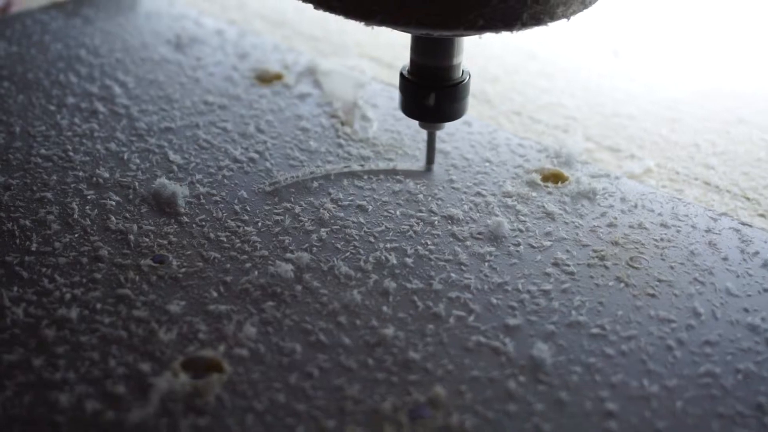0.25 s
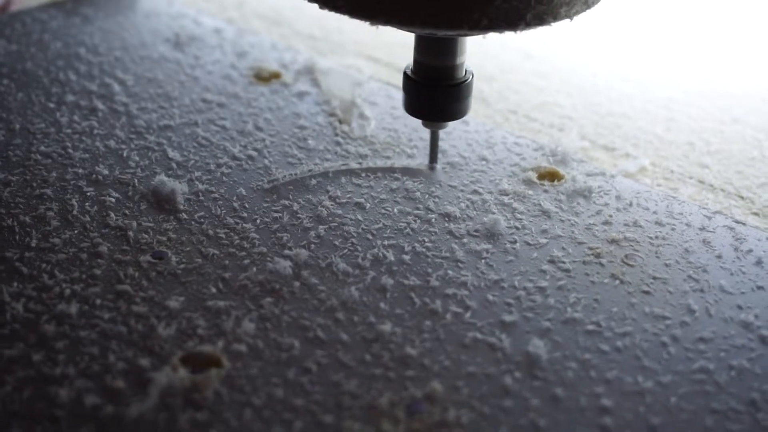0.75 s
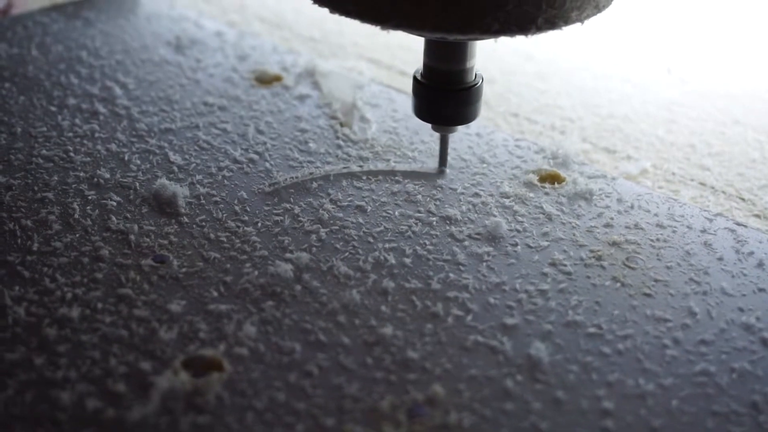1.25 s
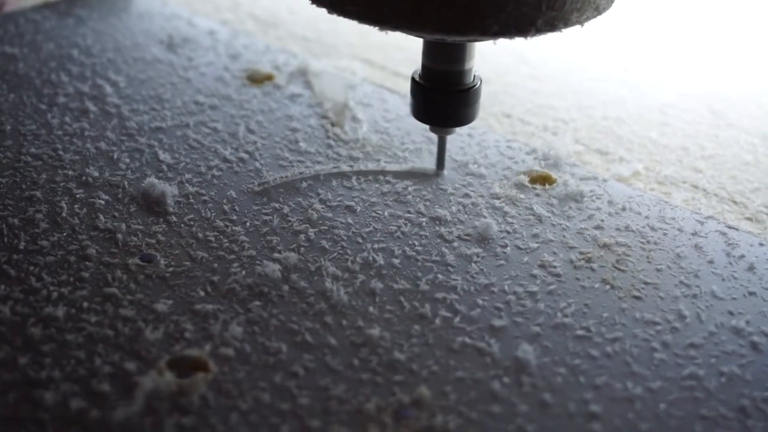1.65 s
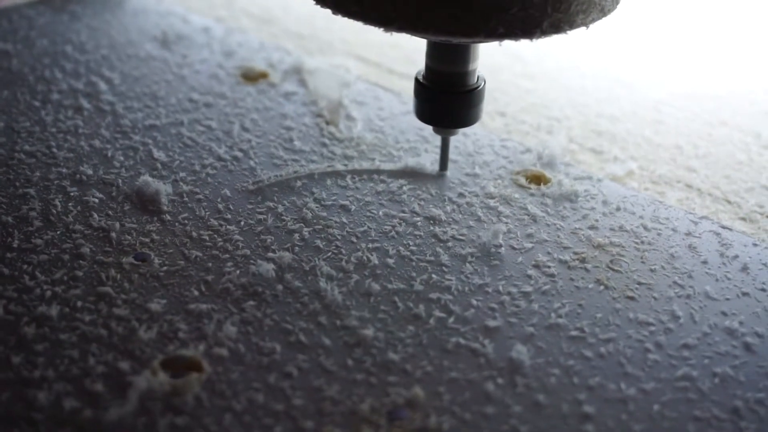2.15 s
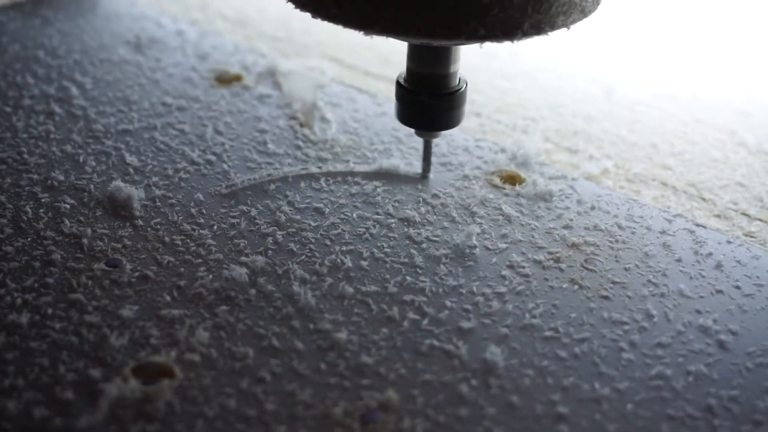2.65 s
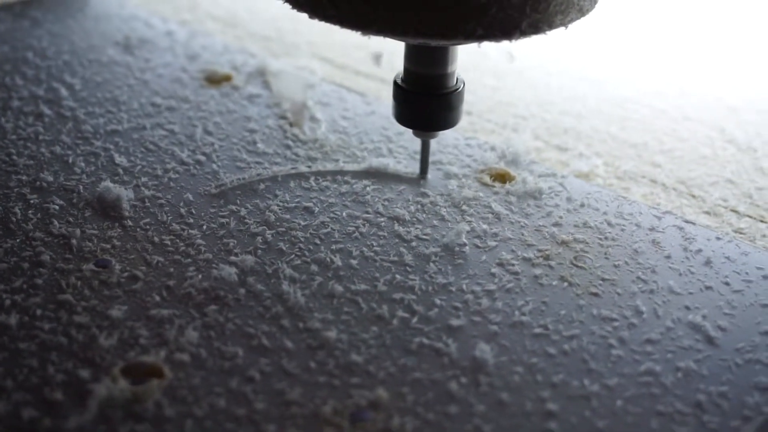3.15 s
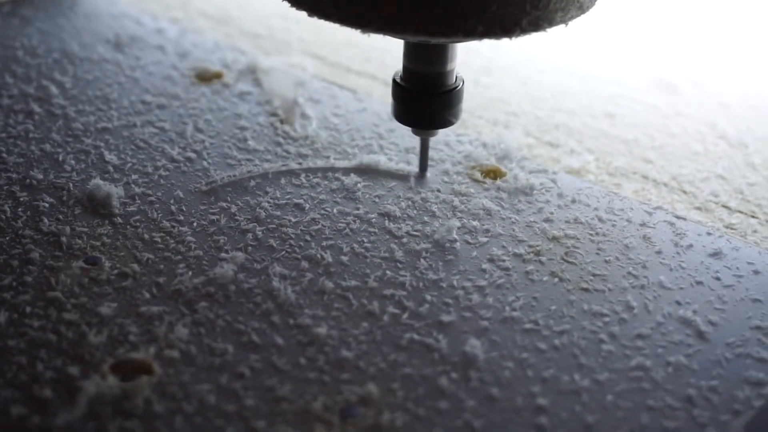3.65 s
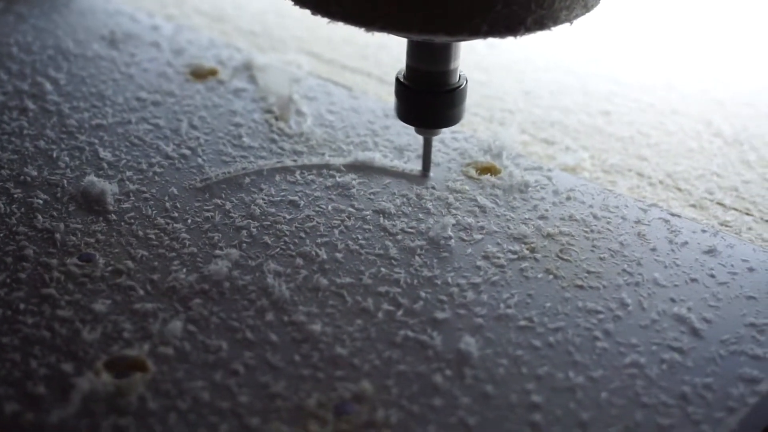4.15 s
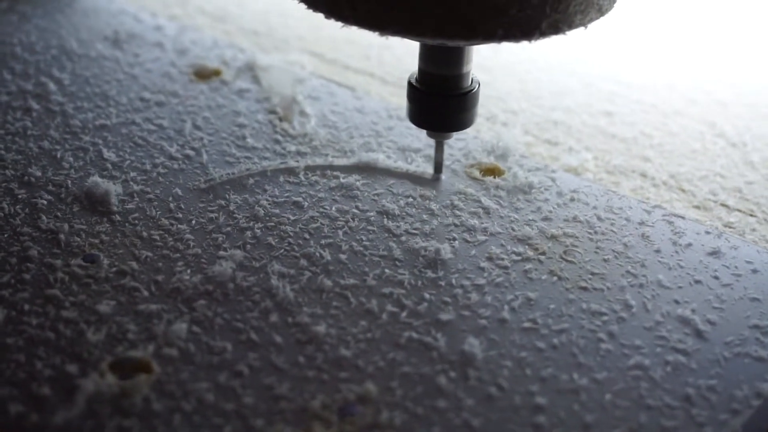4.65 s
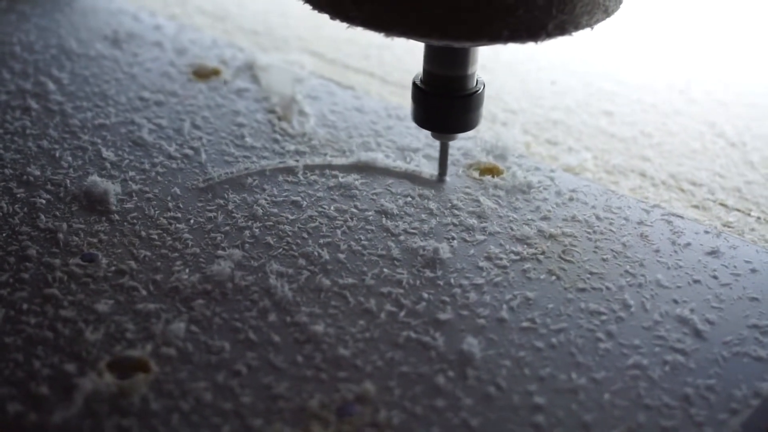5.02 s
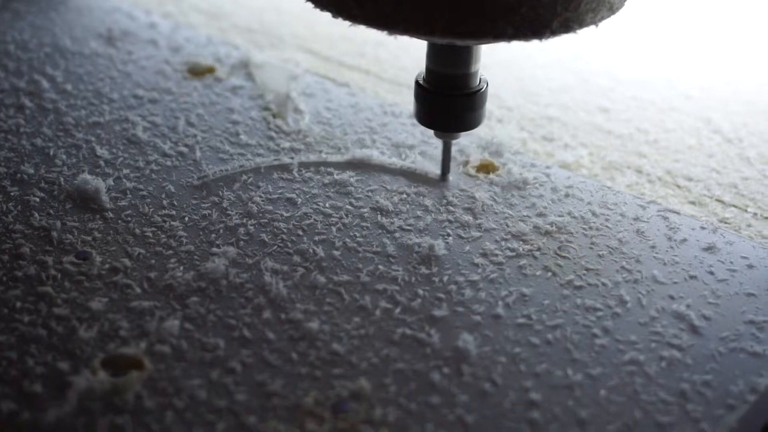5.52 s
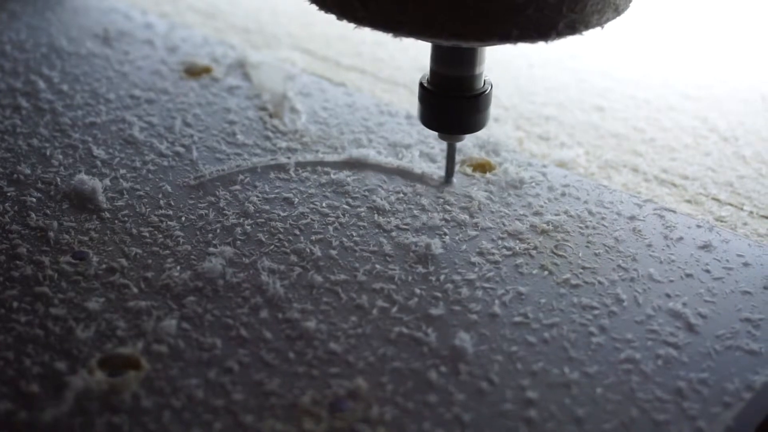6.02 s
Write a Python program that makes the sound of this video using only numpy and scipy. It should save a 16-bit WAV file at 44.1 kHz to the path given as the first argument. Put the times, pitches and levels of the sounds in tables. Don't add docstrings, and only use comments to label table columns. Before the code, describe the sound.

A small milling cutter screams through plastic sheet with a piercing, buzzy high whine, steady chip hiss and a low spindle hum underneath.

```python
import sys
import numpy as np
from scipy import signal
from scipy.fft import rfft, irfft, next_fast_len
from scipy.io import wavfile
from scipy.ndimage import map_coordinates

SR = 44100
rng = np.random.default_rng(int(sys.argv[2]) if len(sys.argv) > 2 else 0)


def digitize_waveform(pressure):
    field = np.atleast_2d(pressure).T
    bounded = np.clip(field, -1, 1)
    quanta = np.round(bounded * 32767).astype(np.int16)
    wavfile.write(sys.argv[1], SR, quanta)


def volts(x):
    e = np.asarray(x, float) / 20
    return 10 ** e


N = 276948
T = np.arange(N) / SR
PORTS = np.array([[.5], [-.5]])
SHAFT_HZ = 399.53


def unit(x):
    return x / np.sqrt(np.mean(x ** 2) + 1e-20)


def along(points, hz):
    f, v = np.transpose(points)
    return np.interp(np.log(hz + 1), np.log(f + 1), v)


def curves(rows):
    s, *columns = np.transpose(rows)
    return [np.interp(T, s, column) for column in columns]


def wobble(rate):
    coarse = T[::16]
    knots = rng.standard_normal(int(N * rate / SR) + 4)
    return np.interp(T, coarse, map_coordinates(knots, [coarse * rate]))


def rush(modes, gate=1):
    # frequency in Hz, left-right coherence from 0 to 1.
    alike = [(60, 1), (130, 1), (400, 1), (700, 1), (1400, 0.5), (3100, 0.75), (6800, 0.065),
             (15000, 0.083)]
    # frequency in Hz, left-right level difference in dB.
    sides = [(60, 0), (110, 1), (200, -4), (380, 9), (700, -6.5), (1290, -2.5), (2380, -8), (4400, -7.5),
             (8120, -1.5), (15000, -11.5)]
    m = next_fast_len(N)
    hz = np.fft.rfftfreq(m, 1 / SR)
    power = sum(volts(2 * db) / (1 + (2 * (hz - center_hz) / width_hz) ** 2) ** 2
                for center_hz, width_hz, db in modes)
    angle = np.arccos(np.clip(along(alike, hz), -1, 1)) / 2
    noise = rfft(gate * rng.standard_normal((2, N)), m)
    mid, side = noise * [np.cos(angle), np.sin(angle)]
    spectrum = np.array([mid + side, mid - side]) * np.sqrt(power) * volts(PORTS * along(sides, hz))
    return unit(irfft(spectrum, m)[:, :N])


def jams(half_s):
    # time in seconds, phase jump in cycles, level dip in dB.
    slips = [(0.294, 0.11, -4.0), (0.893, 0.14, -3.9), (1.106, 0.21, -12.1), (1.409, 0.09, -3.6),
             (1.532, 0.01, -4.8), (1.581, -0.07, -4.6), (1.979, 0.17, -9.6), (2.656, -0.61, -12.3),
             (2.728, 0.01, -6.6), (2.826, 0.11, -6.0), (2.84, 0.22, -9.0), (2.854, 0.07, -9.0),
             (3.201, -0.69, -15), (3.855, -0.14, -5.7), (3.922, 0.13, -3.4), (4.645, -0.25, -6.4),
             (4.657, 0.08, -13.4), (4.994, 0.01, -4.0), (5.188, 0.07, -3.2), (5.304, 0.25, -5.1),
             (5.314, -0.1, -4.4), (5.666, -0.04, -3.4), (5.714, -0.02, -5.8), (5.905, 0.13, -3.8),
             (5.938, 0.03, -6.5), (6.064, -0.13, -6.7), (6.082, 0.08, -7.1)]
    s, jump, dip_db = np.transpose(slips)
    kicks = np.zeros((2, N))
    kicks[:, np.round(s * SR).astype(int)] = jump, dip_db
    hump = np.hanning(round(2 * half_s * SR))
    step, dip = signal.fftconvolve(kicks, hump[None], "same", axes=1)
    return np.cumsum(step) / hump.sum(), dip


def stumbles(rate, cycles, rise_s, settle_s):
    when, size = rng.random((round(rate * T[-1]), 2)).T
    kicks = np.bincount((when * N).astype(int), -cycles * np.log(size), N)
    t = T[:SR // 4]
    response = np.exp(-t / settle_s) * (1 - np.exp(-(t / rise_s) ** 2))
    return signal.fftconvolve(kicks, response)[:N]


def rival_mode(ragged_db):
    above_hz = 271
    noise = [1, 1j] @ rng.standard_normal((2, N))
    shake = signal.lfilter([1], [1, -.985], noise) * np.exp(2j * np.pi * above_hz * T)
    flare = volts(-26 - 1.8 * np.maximum(ragged_db, -8) + 3 * wobble(45))
    return (1 + flare * shake / np.abs(shake).std()) / np.sqrt(1 + 5 * flare ** 2)


def chatter(turn, bite_db, shallow):
    # left level in dB, right level in dB,
    # left drift in dB, right drift in dB, left phase lead in radians.
    ring = [(-64, -63.5, -2, -2.5, -0.1), (-54, -51, -4, 2.5, -0.6), (-45, -46, 1, 0.5, -0.2),
            (-35, -42, 5.5, 2.5, 1.0), (-30.5, -36.5, -2, 4, -0.3), (-20.2, -19.1, 1.4, -0.7, -1.5),
            (-36, -25.6, -3, 2, -3.0), (-20.6, -19.1, 1.3, 0.3, -1.8), (-34, -20.8, -2.5, 0.5, -2.5),
            (-42, -38, -3, 0, 1.7), (-40, -33, 4, 3, -1.5), (-59, -51, 3, -3, 0.6), (-59, -56, 0, 4, -1.6)]
    # left level in dB, right level in dB,
    # left drift in dB, right drift in dB, left phase lead in radians.
    octave = [(-56, -48, 2, -5, 0.1), (-56, -55, 4.5, 1, -1.8), (-53, -49, -0.5, -9, 2.6),
              (-46, -41, 3, 6, -0.3), (-51, -39.5, 4, 8, 1.3), (-45, -36, -3.5, -2, 0.3),
              (-41, -35, 6, -8.5, 0.7), (-37, -31, 1.5, -7.5, -0.5), (-46.5, -37.5, -3, -4, 3.1),
              (-54, -46, 12, -8, -3.0)]
    ring_hz, sag_hz_per_s, shallow_hz = 7149.6, .75, 9
    entry_db = 1.3
    swing_db = -3.5

    step, dip_db = jams(half_s=.006)
    ragged_db = np.roll(jams(half_s=.012)[1], round(.005 * SR))
    wander = np.cumsum(rng.standard_normal(N)) * 0.0011 + 0.013 * wobble(90)
    wander += stumbles(rate=50, cycles=0.041, rise_s=0.00072, settle_s=0.032)
    wander += -.009 * np.maximum(ragged_db, -11) * wobble(400)
    cycles = np.cumsum(ring_hz - sag_hz_per_s * T + shallow_hz * shallow) / SR + step + wander
    rival = rival_mode(ragged_db)

    spot = 2 * T / T[-1] - 1
    out = np.zeros((2, N))
    for multiple, rows in enumerate((ring, octave), 1):
        for k, (*levels, lead) in enumerate(rows, -6):
            db, drift = np.reshape(levels, (2, 2, 1))
            if multiple == 1:
                swell_db = max(0.5 - 1.16 * (k + .5) ** 2, -3.5)
                phase = (2.85 - .3 * k) * k + 3.15 - .6 * spot * (k == 0)
                phase = phase + 1.6 * np.sign(k) * (abs(k - 1) > 2)
            else:
                swell_db = -3.5
                phase = 3.4 * k - 1.2
            line_db = db + drift * spot + (swell_db + PORTS * swing_db) * spot ** 2
            line_db = line_db - (k >= 0) * entry_db * shallow + 1.1 * wobble(4.0) + 0.45 * wobble(40)
            angle = 2 * np.pi * multiple * cycles + k * turn + phase + lead * (PORTS + .5)
            out += volts(line_db) * np.real(rival * np.exp(1j * angle))
    return np.sqrt(2) * volts(bite_db + .5 * dip_db + .3 * wobble(70)) * out


def tone(phase, db, pan_db=0):
    return np.sqrt(2) * volts(db + PORTS * pan_db) * np.cos(phase)


def spindle(turn, hum_db):
    # level in dB relative to the hum, left-right difference in dB.
    shaft = [(-13, 4.5), (-30, -11), (-32.5, -12.5), (-40, -20.5), (-33, -18), (-20, 4), (-52, -10)]
    # harmonic order, level in dB, left-right difference in dB.
    field = [(2, -51, -2), (4, -69, -3), (8, -61, -2), (10, -64, 0), (11, -52, 0), (13, -48.5, 1),
             (17, -46, -6)]
    # frequency in Hz, level in dB.
    bearing = [(443, -59), (462, -57), (505, -67), (548, -74), (1444, -66), (3950, -66)]
    field_hz, meet_s = 399.93, .97
    out = tone(turn, hum_db + 0.058 * wobble(28))
    steadier_db = .5 * (hum_db + hum_db.mean())
    for k, (db, pan_db) in enumerate(shaft, 2):
        out -= tone(k * turn, steadier_db + db + 0.88 * wobble(1.88), pan_db)
    field_turn = 2 * np.pi * (field_hz * (T - meet_s) + SHAFT_HZ * meet_s)
    for k, db, pan_db in field:
        out -= tone(k * field_turn, db + .7 * wobble(3), pan_db)
    for hz, db in bearing:
        out = out + tone(2 * np.pi * hz * T, db + 0.22 * wobble(3.5))
    return out


def cutting(turn):
    # frequency in Hz, width in Hz, level in dB.
    sheet_modes = [(1209, 126, -6), (1555, 310, -16), (1917, 150, -13.5), (2453, 280, -4), (2714, 307, 3),
                   (3390, 380, -6), (4070, 83, -7.5), (4810, 77, 1)]
    # frequency in Hz, width in Hz, level in dB.
    chip_modes = [(5560, 220, -13), (5600, 730, -5.5), (6554, 520, 6.5), (7690, 520, 3), (8430, 570, -0.5),
                  (8540, 1890, -1), (11170, 950, -8.5), (12053, 310, 5.5), (12700, 590, -2.5),
                  (13600, 1100, -2.5), (14600, 1100, -1.5), (15800, 530, -1.5)]
    rise_db = 0.2656 * T
    bite = 1 + .25 * np.cos(turn)
    puff = volts(-.15 * jams(half_s=.01)[1])
    sheet = volts(-42.5 + rise_db + 0.99 * wobble(25)) * rush(sheet_modes)
    chips = volts(-28 + rise_db + 0.5 * wobble(22)) * puff * rush(chip_modes, bite)
    return sheet + chips


def machine():
    # time in seconds, feed motor effort in dB.
    feed = [
        (0, -11),
        (1, -10),
        (2.3, -7),
        (2.95, -5),
        (3.25, 6),
        (4.1, 2),
        (4.5, -4),
        (5.6, -2.5),
        (6.28, -3),
    ]
    # time in seconds, jolt in dB.
    jolts = [
        (.58, 3),
        (1.15, 5),
        (1.9, 3.5),
        (2.85, 12),
        (3.45, 4),
        (3.88, 6),
        (5.15, 4.5),
        (5.44, 6.5),
        (5.73, 4),
        (6.06, 3.5),
    ]
    # frequency in Hz, phase wander in radians, level in dB, share of effort, share of jerk.
    drone_rows = [(139, 0.91, -64, 0.67, .3), (190, 0.58, -59, 1.33, .2), (237.5, 0.65, -59, 0.34, 0.87)]
    # frequency in Hz, width in Hz, level in dB.
    frame_modes = [(60, 45, -21), (246, 185, -1.5), (397, 120, 7), (437, 12, 1.5), (837.4, 23, 6)]
    half_s = 0.11
    effort_db, = curves(feed)
    jerk_db = sum(db * np.exp(-((T - s) / half_s) ** 2) for s, db in jolts)
    frame_db = -62 + 0.23 * effort_db + jerk_db
    drones = 0
    for hz, rad, db, pull, jerk in drone_rows:
        level = volts(db + pull * effort_db + jerk * jerk_db + 2.6 * wobble(5.3))
        drones = drones + level * np.cos(2 * np.pi * hz * T + rad * wobble(5.1))
    panel = volts(frame_db + 4.5) * rush([(663, 176, 0)])
    rumble = volts(0.38 * frame_db - 31.5 + .5 * T + 1.5 * wobble(4)) * rush(frame_modes)
    return volts(.5 * T - 1.5) * (drones + panel) + rumble


def scene():
    # time in seconds, depth of cut in dB.
    bite = [
        (0, -1),
        (.62, -0.5),
        (.78, 1),
        (1.9, 0.3),
        (2.5, 1.56),
        (3.7, 0.5),
        (5.2, 0),
        (5.8, -1.5),
        (6.28, -2),
    ]
    bite_db, = curves(bite)
    shallow = .5 - .5 * np.tanh((T - .72) / 0.027)
    hum_db = -34.5 + 1.12 * T + 0.75 * bite_db - 0.85 * shallow
    turn = 2 * np.pi * SHAFT_HZ * T + 0.01 * wobble(16)
    return chatter(turn, bite_db, shallow) + spindle(turn, hum_db) + cutting(turn) + machine()


def low_pass(x):
    return signal.sosfilt(signal.butter(12, 16040, fs=SR, output="sos"), x)


def record(dry):
    band_limit = signal.ellip(10, .1, 60, 15680, fs=SR, output="sos")
    kept = signal.sosfiltfilt(band_limit, dry)
    return low_pass(kept)


dry = scene()
out = record(dry)
digitize_waveform(out)
```